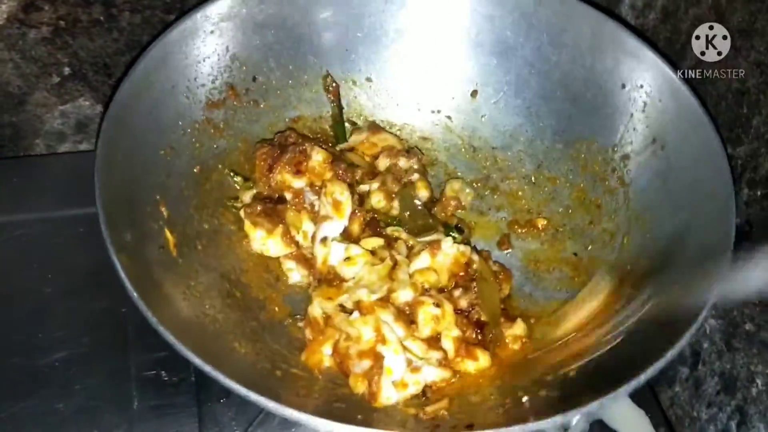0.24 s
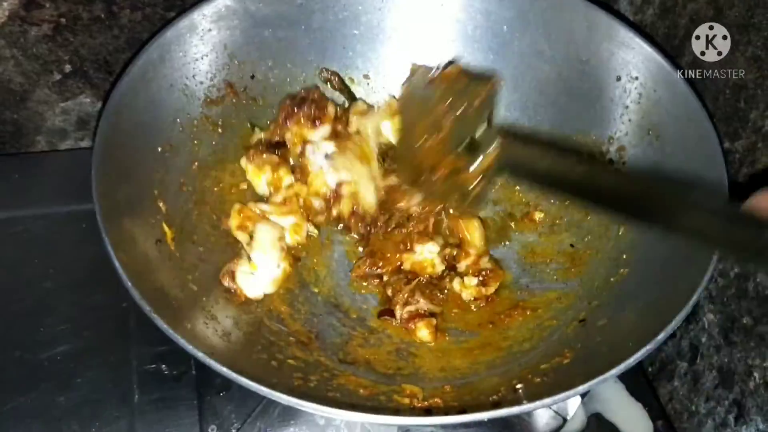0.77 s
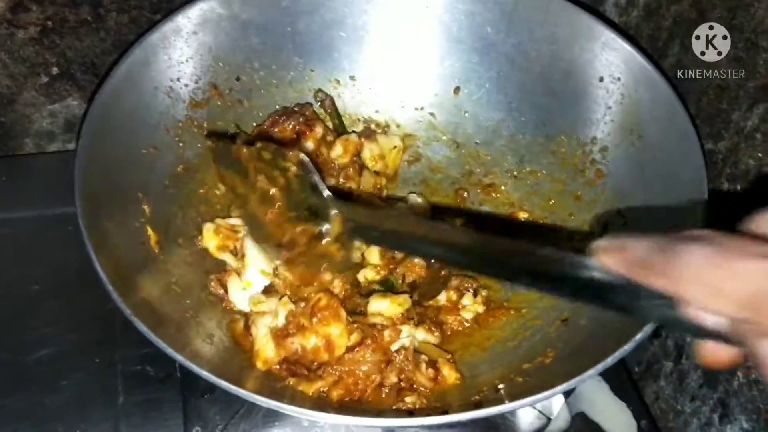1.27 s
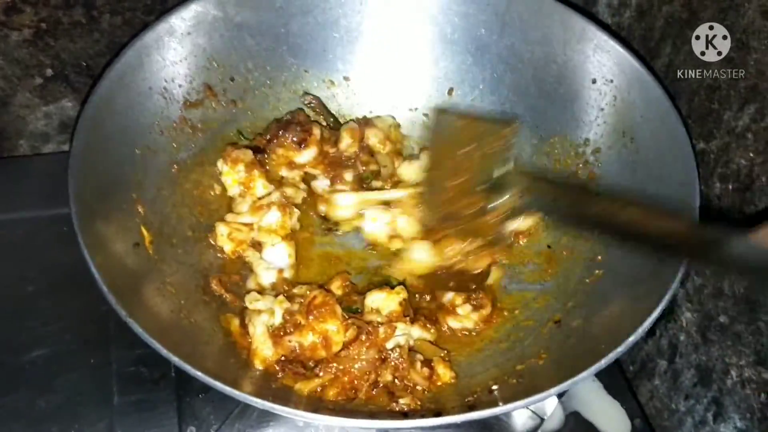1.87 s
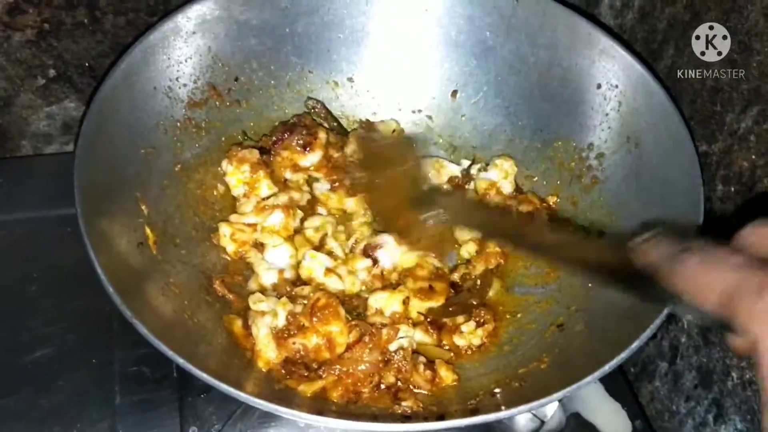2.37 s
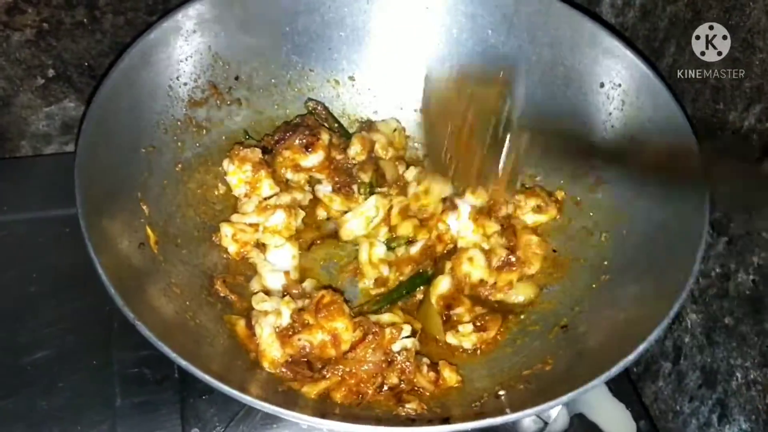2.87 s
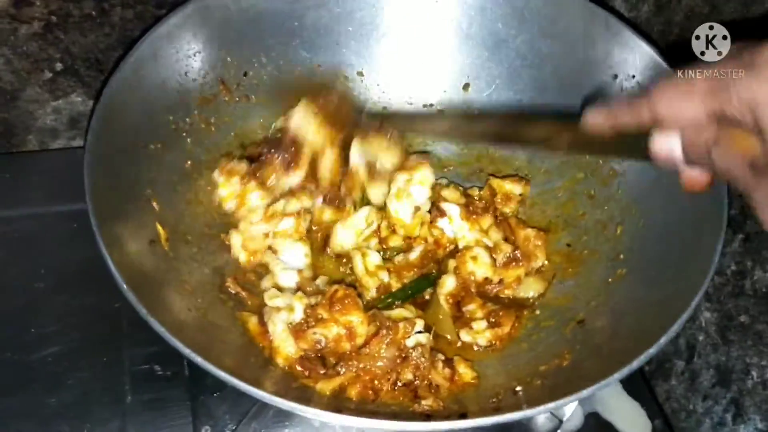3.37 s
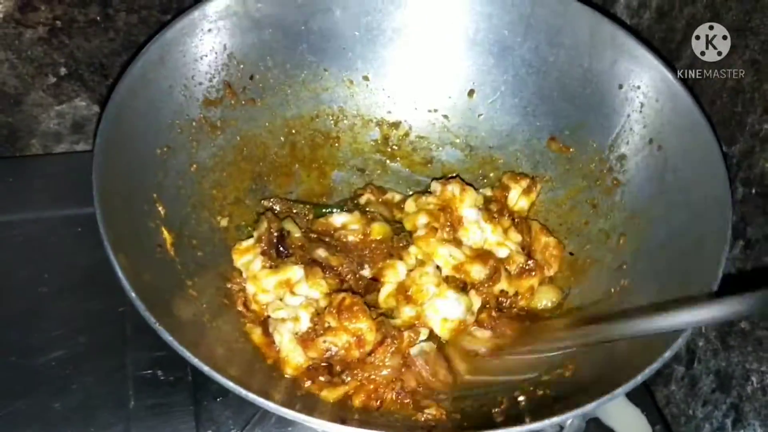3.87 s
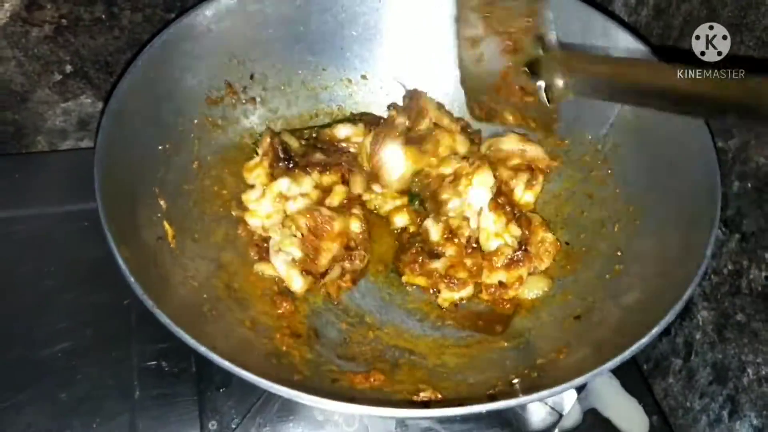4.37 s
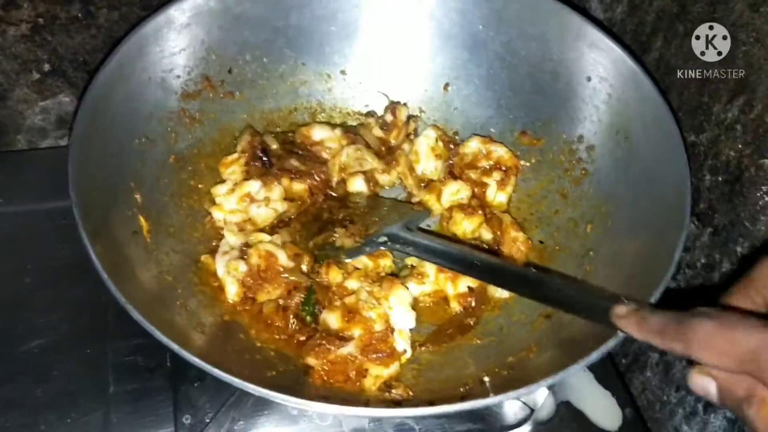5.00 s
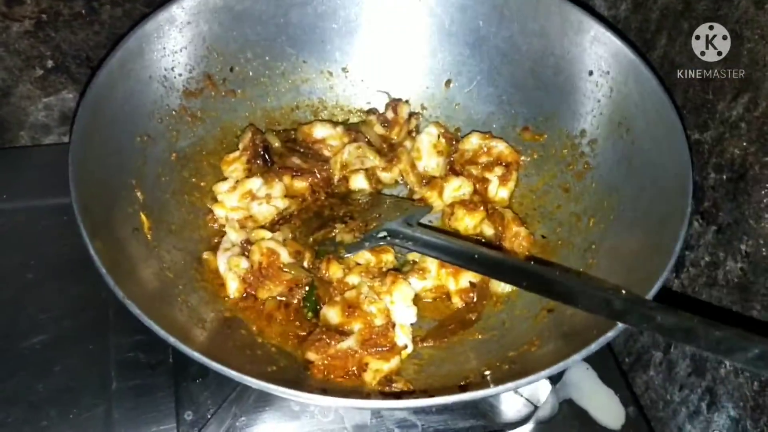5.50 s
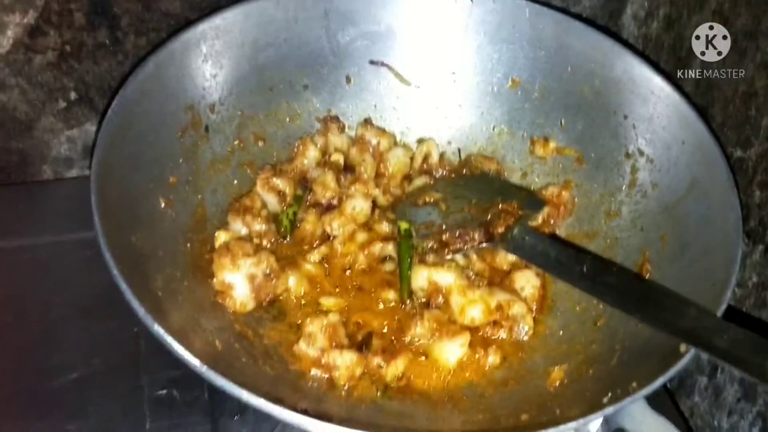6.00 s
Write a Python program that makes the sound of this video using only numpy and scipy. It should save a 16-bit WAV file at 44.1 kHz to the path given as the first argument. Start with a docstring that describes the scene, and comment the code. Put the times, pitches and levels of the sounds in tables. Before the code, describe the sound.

Chunks of fat sizzle and crackle in a metal wok in a small kitchen, heard close up. A steel spatula clatters against the pan, then stirs with irregular knocks, gritty scrapes and a few tiny squeaks. The frying swells as the food is turned. Near the end the sound fades out and returns as a quiet, dull simmer over a low hum.

```python
"""A steel spatula clatters into a metal wok of sizzling chunks of fat in a small kitchen.
Steam bubbles burst by the thousand and flare as turned food meets hot metal. The blade knocks, drags
and judders on the modes of the pan and squeaks on its own; the hardest knocks duck the gain.
Near the end the sound fades out and returns as a quiet, dull simmer over a low hum."""
import sys
import numpy as np
from scipy import signal
from scipy.fft import rfft, irfft, next_fast_len
from scipy.io import wavfile
from scipy.ndimage import uniform_filter1d, minimum_filter1d

SR = 44100
rng = np.random.default_rng(int(sys.argv[2]) if len(sys.argv) > 2 else 0)


def int16_out(signal):
    """Quantize to a 16-bit WAV file."""
    q = np.round(np.clip(np.atleast_2d(signal).T, -1, 1) * 32767)
    wavfile.write(sys.argv[1], SR, q.astype(np.int16))


N = 275625
TIME = np.arange(N) / SR
SIMMER_START_S = 5.75
PUSH_ATTACK_S, CRACKLE_DECAY_S = 0.0034, 0.5
FOOD_DAMPING = 1

# dense ring of pan and kitchen: (frequency [Hz], level [dB])
CLANG = [(25, -32), (70, -0.5), (170, -8), (300, 2), (900, 8.5), (1600, 1.5), (2900, 7), (4100, -9),
         (5400, -0.5), (8000, -16.5), (11000, -19.5), (15000, -20)]
# blade lands in the food and pushes: (time [s], length [s], landing [dB], pressure [dB], grit [dB])
STROKES = [(0.077, 0.23, 3, -21, -27), (0.388, 0.061, -3, -27.5, -32), (0.536, 0.074, -0.5, -29, -34),
           (0.672, 0.17, -8, -35, -56), (1.447, 0.079, -15, -38, -47), (1.837, 0.034, -13, -39, -36),
           (2.074, 0.028, -12, -35, -50.5), (2.991, 0.043, -11.5, -42, -39),
           (3.178, 0.022, -35, -28.5, -45), (3.267, 0.11, -3, -27, -31), (3.56, 0.074, -47, -62, -30),
           (3.679, 0.031, -7.5, -30.5, -52), (3.838, 0.25, -16, -31, -30.5), (4.143, 0.21, -2, -34.5, -52),
           (4.342, 0.097, -6, -28.5, -30.5), (4.875, 0.036, -18, -39, -55),
           (5.124, 0.069, 0.5, -30.5, -27.5), (5.282, 0.011, -9.5, -36.5, -41),
           (5.424, 0.036, -8.5, -34, -30)]


def sizzle(split_hz=4000, crackle_db=6.5, fizz_db=5.5):
    """Big bubbles crackle, small ones fizz; both swell as wet food meets hot metal."""
    # frying bubbles: (frequency [Hz], level [dB])
    spectrum = [(100, -62), (600, -20), (1000, -12.5), (1600, -6.5), (2100, -5), (2850, 0.5), (3400, -4),
                (4050, -11), (5250, 0), (6500, -8), (8100, -15), (11000, -19), (13000, -15.5),
                (14400, -10.5), (15500, -16.5)]
    crackle = off_blade(band(bubbles(spectrum, rate_hz=2400, spread_db=1.5), split_hz, "low", order=6))
    fizz = band(bubbles(spectrum, rate_hz=3000, spread_db=0.2), split_hz, "high", order=6)
    return (unit(crackle) * undb(crackle_db) * boiling(CRACKLE_DECAY_S, column=1)
            + unit(fizz) * undb(fizz_db) * boiling(decay_s=0.38, column=2, steady_db=-1))


def bubbles(spectrum, rate_hz, spread_db, spots=5):
    """Steam bubbles burst at several spots in the oil."""
    pops = sum(ring(clicks(N, rate_hz / spots, spread_db), bowl()) for _ in range(spots))
    return unit(colour(pops, spectrum))


def boiling(decay_s, column, steady_db=0, rise_s=0.037):
    """Bubbling strength: steady frying plus flares that fade as the wet surface dries."""
    # steady frying: (time [s], level [dB])
    frying = [(0, -45.5), (.9, -31), (1.7, -30), (2.4, -37), (3.1, -37), (3.8, -34), (4.2, -32.5),
              (5.6, -32.5)]
    # turned food meets hot metal: (time [s], crackle [dB], fizz [dB])
    flares = [(-.04, -19, -24), (.21, -34.5, -34), (.41, -31.5, -27), (.79, -31, -51), (1.17, -30, -36),
              (1.38, -27, -43), (1.59, -30, -48.5), (1.878, -27.5, -33.5), (2.161, -28, -29),
              (2.83, -32.5, -33), (3.2, -30, -31.5), (3.31, -28, -33.5), (3.55, -38, -36.5),
              (3.93, -28.5, -29), (4.06, -28, -37), (4.399, -30.5, -57), (4.53, -27.5, -32.5),
              (4.979, -27.5, -36), (5.25, -30, -58), (5.429, -32.5, -55)]
    power = sum((undb(row[column]) * envelope(row[0], rise_s, rise_s, decay_s)) ** 2 for row in flares)
    return np.sqrt(undb(curve(frying) + steady_db) ** 2 + power)


def bowl(pop_s=0.00035, echo_db=-19, echo_s=0.041):
    """One burst bubble: a short pop, then reflections from bowl and walls."""
    t = TIME[:4096]
    response = air(len(t)) * (np.exp(-t / pop_s) + undb(echo_db) * np.exp(-t / echo_s))
    return response / np.sqrt(np.sum(response ** 2) / 2)


def off_blade(x, lag_s=0.000685, travel=0.38, sway_hz=2.78, share=0.24):
    """Reflection off the moving blade sweeps notches through the sound."""
    delayed_s = TIME - lag_s * np.exp(travel * wander(sway_hz))
    return x + share * np.array([np.interp(delayed_s, TIME, port) for port in x])


def knocks(level_db=-22, glance_s=0.048, thin_hz=230, edge_hz=9000, bite_hz=2200):
    """Each blow is a tick plus chatter; soft contact misses the high modes, the bare edge drives them."""
    # bare blade on pan: (time [s], strength [dB], brightness [Hz], chatter [s], damping [0-1])
    hits = [(0.068, 4.5, 6000, 0.0012, 0.9), (0.077, 1.5, 3800, 0.011, 0.94),
            (0.098, 9, 7000, 0.00074, 0.8), (0.112, 4.5, 1500, 0.0065, 0.8), (0.124, 4, 1200, 0.002, 0.6),
            (0.241, 3.5, 1000, 0.016, 0.62), (2.224, 8.5, 4500, 0.0025, 0.5),
            (2.231, 6.5, 3400, 0.0087, 0.13), (2.247, 5.5, 3000, 0.011, 0.1),
            (2.269, -2, 2400, 0.0023, 0.23), (2.472, 10, 8600, 0.002, 0.29),
            (2.4757, 6.5, 10000, 0.005, 0.32), (2.521, -2.5, 1600, 0.0033, 0.2),
            (2.839, -6, 4230, 0.0015, 0.2), (3.175, -14.5, 12000, 0.0011, 0.55),
            (3.387, 0.5, 1000, 0.021, 0.64), (3.439, -3.5, 860, 0.015, 0.7),
            (3.896, -8.5, 12000, 0.015, 0.74), (3.943, -4.5, 700, 0.0026, 0.8),
            (4.156, -4, 810, 0.0049, 0.25), (5.0776, -7, 10000, 0.002, 1)]
    out, t = np.zeros((2, N)), TIME[:SR // 2]
    for start_s, db, bright_hz, chatter_s, damping in hits + landings():
        tick = np.exp(-chatter_s / glance_s)  # glancing blow: less tick, more chatter
        chatter = band(clicks(len(t), rate_hz=2500, spread_db=2.0), thin_hz, "high", order=1)
        chatter *= np.exp(-t / chatter_s)
        force = np.sqrt(1 - tick ** 2) * chatter / (np.linalg.norm(chatter) + 1e-9)
        force[0] += tick
        force += bright_hz / edge_hz * band(force, bite_hz, "high", order=1)
        blow = ring(band(force, bright_hz, "low"), pan(damping, spot_db=0.5, clang_db=11.0))
        add(out, start_s, undb(db + level_db) * blow)
    return out


def landings(typical_hz=780, typical_db=-15, db_per_octave=9, chatter_s=0.014):
    """Each stroke opens with a knock cushioned by food; harder is brighter."""
    return [(start_s, db, typical_hz * 2 ** ((db - typical_db) / db_per_octave), chatter_s, FOOD_DAMPING)
            for start_s, _, db, _, _ in STROKES]


def pan(damping, spot_db, clang_db, crack_db=7, crack_s=0.00077, wall_hz=1040, wall_width_hz=260):
    """Pan response at one spot: modes, first crack, dense clang. Food and blade choke the wall's ring."""
    # modes of the loaded pan, plus the blade's brief first ring near 2.9 kHz: (frequency [Hz], level [dB], t60
    # [s])
    pan_modes = [(81.2, -11.5, 0.52), (155, -13.5, 0.29), (243.4, -7, 0.73), (273.5, -7.5, 0.4),
                 (331, -2.5, 0.24), (370.1, 1, 0.24), (420.7, 0.5, 0.14), (572, -0.5, 0.11),
                 (630.8, 3.5, 0.23), (753, 0, 0.18), (877, 2.5, 0.48), (945, 10.5, 0.2), (1017, 0.5, 0.28),
                 (1092, 8.5, 0.3), (1172, 1.5, 0.31), (1400, -13.5, 0.28), (1744, -1.5, 0.22),
                 (2545, 3, 0.13), (2750, 6, 0.2), (2940, 5, 0.12), (2960, 14.5, 0.0098), (3274, 3.5, 0.066),
                 (3242, 2, 0.11)]
    # clang decay: (frequency [Hz], t60 [s])
    clang_t60 = [(200, 0.36), (1000, 0.34), (3000, 0.21), (6000, 0.21), (14000, 0.23)]
    t = TIME[:SR // 2]
    hz, db, t60_s = np.transpose(pan_modes)[:, :, None]
    choke_db = lambda f: 12 * damping / (1 + ((f - wall_hz) / wall_width_hz) ** 2)
    weight = undb(db - choke_db(hz) + spot_db * rng.standard_normal(hz.shape))
    weight *= rng.choice([-1, 1], hz.shape)
    # short waves reach the two ports out of step
    skew_rad = rng.standard_normal(hz.shape) * np.minimum(hz / 1100, 1)
    fading = 1000 ** (-t / (t60_s * undb(-choke_db(hz) / 2)))
    modes = np.array([np.sum(weight * fading * np.cos(2 * np.pi * hz * t + side * skew_rad), 0)
                      for side in (-1, 1)])
    noise, clang = air(len(t)), 0
    for band_hz, band_t60_s in clang_t60:
        share = [(row[0], row[0] == band_hz) for row in clang_t60]
        clang += shape(noise, lambda f: at(share, f)) * 1000 ** (-t / band_t60_s)
    clang *= 1 + undb(crack_db) * np.exp(-t / crack_s)
    clang = shape(clang, lambda f: undb(at(CLANG, f) - choke_db(f) / 2))
    return band(modes + undb(clang_db) * clang, 37, "high")


def drag(soft_hz=540, grit_db=-27, resting_db=-40.5, release_s=0.073, spots=4):
    """The blade sticks and slips; food cushions it, so mostly the low pan modes answer."""
    rubbing = 0
    for _ in range(spots):
        slips = clicks(N, rate_hz=260, spread_db=0.5)
        force = band(slips, soft_hz, "low") + undb(grit_db) * slips
        rubbing += ring(force, pan(FOOD_DAMPING, spot_db=1.5, clang_db=2))
    pressure = undb(resting_db) + pushing(release_s, column=3)
    return pressure * unit(rubbing)


def pushing(release_s, column):
    """Stroke envelope: the blade leans in, holds, lets go."""
    strokes = [undb(row[column]) * envelope(row[0], PUSH_ATTACK_S, row[1], release_s) for row in STROKES]
    return np.max(strokes, axis=0)


def judders(attack_s=0.004, release_s=0.015, drift_hz=4):
    """Pressed hard, the blade sticks and slips on one pan note: a hollow judder or thin squeal. One high note
    also rings out briefly with a hard knock."""
    # single pan notes, mostly stick-slip judders and squeals, one ringing with a hard knock: (time [s], length
    # [s], pitch [Hz], level [dB])
    notes = [(0.073, 0.032, 253, -22), (0.115, 0.06, 623, -17.5), (.15, 0.055, 246, -10.5),
             (.205, 0.12, 243, -23), (0.335, 0.22, 240, -30.5), (0.702, 0.092, 453, -34),
             (1.445, 0.04, 263, -31), (1.84, 0.041, 280, -34), (2.224, .035, 2900, -14.5),
             (3.287, 0.23, 243.4, -25), (3.716, 0.014, 255, -27.5), (3.915, .26, 3160, -28),
             (4.03, 0.059, 365, -31), (4.16, 0.032, 247.7, -22), (4.344, 0.025, 355, -25),
             (5.132, 0.029, 256, -17)]
    drift_cycles = np.cumsum(wander(rate_hz=20)) * drift_hz / SR
    out = 0
    for start_s, length_s, hz, db in notes:
        tone = np.sin(2 * np.pi * (hz * TIME + drift_cycles))
        out += undb(db) * envelope(start_s, attack_s, length_s, release_s) * tone
    return out * flicker(depth_db=4.5, rate_hz=40)


def scrape(band_hz=(1150, 2100)):
    """Wet spice paste grates and smears under the blade on each stroke."""
    grains = clicks(N, rate_hz=900, spread_db=2.0)
    grit = ring(grains, bowl(pop_s=0.0041, echo_db=-13.5, echo_s=0.029))
    return pushing(release_s=0.12, column=4) * unit(band(grit, band_hz, "band"))


def squeaks(width_hz=38, rasp_db=0.5, level_db=5.5, spot_db=5.5, tail_s=0.011):
    """Fast stick-slip drives the blade's modes, differently at each touch, with a dry rasp."""
    # the edge sticks and sings: (time [s], length [s], pitch [Hz], level [dB])
    touches = [(0.093, 0.02, 5270, -23.5), (0.245, 0.017, 5160, -28.5), (3.174, 0.012, 5550, -21),
               (3.888, 0.023, 5630, -15.5), (5.074, 0.011, 5650, -25.5)]
    # blade modes: (frequency / pitch [ratio], level [dB])
    blade_modes = [(0.386, -12), (0.46, -12), (0.836, -2.5), (.905, -8), (0.962, -1), (1.001, 1),
                   (1.045, -9), (1.302, -3), (2.553, -14.5)]
    out, t = np.zeros((2, N)), TIME[:SR // 3]
    ratios, mode_db = np.transpose(blade_modes)
    for start_s, length_s, pitch_hz, db in touches:
        progress = np.minimum(t / length_s, 1)
        grip = np.sqrt(np.maximum(np.sin(np.pi * progress), 0))
        tail = progress * np.exp(-np.maximum(t - length_s, 0) / tail_s)  # the blade rings on
        weights = undb(mode_db - spot_db * rng.standard_normal(len(ratios)))
        peaks = lambda f: weights @ (1 / (1 + ((f - ratios[:, None] * pitch_hz) / width_hz) ** 2))
        tone = band(shape(air(len(t)), peaks), 1800, "high", order=4)
        catches = ring(clicks(len(t), rate_hz=2300, spread_db=1), bowl())
        rasp = colour(band(catches, 6500, "high"), CLANG)
        squeak = unit(tone) + undb(rasp_db) * unit(rasp)
        add(out, start_s, undb(db + level_db) * (grip + tail) * squeak)
    return out


def spits(pitch_hz=2750, scatter=0.053, single_db=-3, small_db=12, spots=5):
    """Large bursts stand out of the sizzle; small ones come at random while the food is wet."""
    # single spits of fat: (time [s], level [dB])
    singles = [(0.63, 0), (1.5547, 15.5), (1.577, 11), (3.981, 3), (6.158, -15)]
    draw_hz = lambda: pitch_hz * np.exp(scatter * rng.standard_normal())
    small = sum(ring(clicks(N, rate_hz=2.5, spread_db=3), spurt(draw_hz())) for _ in range(spots))
    out = undb(small_db) * small * boiling(CRACKLE_DECAY_S, column=1) * (TIME < SIMMER_START_S)
    for start_s, db in singles:
        add(out, start_s, undb(db + single_db) * spurt(draw_hz()))
    return out


def spurt(hz, ring_s=0.00084, splash_db=-3):
    """A wet bubble swells, rings a few cycles, then splashes in the bowl."""
    t = TIME[:4096]
    tone = t * np.exp(-t / ring_s) * np.sin(2 * np.pi * hz * t)
    splash = band(bowl(pop_s=0.0015, echo_db=-10.5, echo_s=0.035), [1900, 3500], "band", order=3)
    return tone / np.linalg.norm(tone) + undb(splash_db) * splash / np.linalg.norm(splash[0])


def simmer(level_db=-50, hum_hz=101, hum_width_hz=6, hum_db=-54):
    """Gentler, duller bubbling over a wavering hum."""
    # simmering bubbles: (frequency [Hz], level [dB])
    spectrum = [(80, -55), (250, -20), (400, -23), (750, -25.5), (1500, -23), (2400, -19), (3100, -20.5),
                (4000, -28.5), (5300, -23), (6800, -34), (8500, -64), (14500, -53)]
    hum = wander(hum_width_hz, centre_hz=hum_hz)
    return undb(level_db) * bubbles(spectrum, rate_hz=4900, spread_db=-0.5) + undb(hum_db) * hum


def kitchen(level_db=-56):
    """Steady low rumble of stove and room."""
    # rumble: (frequency [Hz], level [dB])
    spectrum = [(20, -33.5), (31, -9.5), (47, 7), (62, -3.5), (80, -1), (130, 0), (190, -29.5), (300, -13),
                (700, -23), (1500, -49)]
    return undb(level_db) * unit(colour(air(N), spectrum))


def air(size, alike_hz=800):
    """Diffuse noise at two close microphone ports: alike in the bass, unrelated in the treble."""
    mid, side = rng.standard_normal((2, size))
    apart = lambda f: .5 * f ** 2 / (f ** 2 + alike_hz ** 2)
    mid = shape(mid, lambda f: np.sqrt(1 - apart(f)))
    side = shape(side, lambda f: np.sqrt(apart(f)))
    return np.array([mid + side, mid - side])


def clicks(size, rate_hz, spread_db):
    """Impulses of random time, sign and strength."""
    timing, sign, strength = rng.random((3, size))
    amplitude = undb(-spread_db * np.log(np.maximum(strength, .004)))
    return (timing < rate_hz / SR) * np.sign(sign - .5) * amplitude


def wander(rate_hz, centre_hz=0):
    """Narrow-band noise, unit RMS."""
    return unit(shape(rng.standard_normal(N), lambda f: np.exp(-((f - centre_hz) / rate_hz) ** 2)))


def flicker(depth_db, rate_hz):
    return undb(depth_db * wander(rate_hz))


def envelope(start_s, attack_s, hold_s, release_s):
    rise = np.clip((TIME - start_s) / attack_s, 0, 1)
    return rise * np.exp(-np.maximum(TIME - start_s - hold_s, 0) / release_s)


def undb(db):
    return 10 ** (np.asarray(db) / 20)


def unit(x):
    return x / np.sqrt(np.mean(x ** 2))


def curve(table):
    return np.interp(TIME, *np.transpose(table))


def at(table, hz):
    """Read (frequency [Hz], value) rows on a log-frequency axis."""
    f, value = np.transpose(table)
    return np.interp(np.log(hz + 1), np.log(f), value)


def shape(x, gain):
    """Filter by gain(frequency [Hz])."""
    size = next_fast_len(x.shape[-1] + 2048)
    return irfft(rfft(x, size) * gain(np.fft.rfftfreq(size, 1 / SR)), size)[..., :x.shape[-1]]


def colour(x, spectrum):
    return shape(x, lambda f: undb(at(spectrum, f)))


def band(x, hz, kind, order=2):
    return signal.sosfilt(signal.butter(order, np.minimum(hz, .45 * SR), kind, fs=SR, output="sos"), x)


def ring(force, response):
    return signal.oaconvolve(np.atleast_2d(force), response, axes=1)[:, :len(force)]


def add(out, start_s, x):
    start = int(start_s * SR)
    out[:, start:start + x.shape[1]] += x[:, :N - start]


def lean(left_db):
    """Stereo gains for a left-minus-right level."""
    return undb(np.array([[left_db], [-left_db]]) / 2)


def scene():
    """Frying and stirring give way to the simmer; the blade works slightly left."""
    stirring = lean(2.3) * (drag() + judders()) + scrape()
    blade = lean(5.3) * knocks() + lean(-0.18) * squeaks()
    frying = sizzle() * flicker(depth_db=1.0, rate_hz=24)
    return np.where(TIME < SIMMER_START_S, frying + stirring, simmer()) + blade + spits() + kitchen()


def gain_control(x, ceiling_db=-1.0, hold_s=0.15, release_s=0.057, window=256):
    """A loud knock's first crack gets through and pulls the gain down; it holds, then recovers."""
    power = uniform_filter1d(np.mean(x ** 2, 0), size=window, origin=window // 2 - 1)
    rms = np.sqrt(np.abs(power) + 1e-12)
    excess = np.maximum(np.log(rms / undb(ceiling_db)), 0)
    hold = 2 * int(hold_s * SR / 2) + 1
    held = -minimum_filter1d(-excess, hold, origin=hold // 2)
    recovery = np.exp(TIME / release_s)
    reduction = np.maximum.accumulate(held * recovery) / recovery
    return x * np.exp(-uniform_filter1d(reduction, size=64))


def record(dry):
    """Port colour, gain control, fade, steep top cut."""
    # two microphone ports: (frequency [Hz], left minus right [dB])
    balance = [(60, -1), (200, -2), (380, 2), (700, -3), (1290, -6), (2400, -10.5), (3300, -7.5),
               (4200, 0.5), (5300, 10), (8000, 3.5), (12000, 5), (15000, 14)]
    # fade out and in: (time [s], gain [ratio])
    fade = [(5.6, 0.2), (5.66, 0.07), (5.675, 0), (5.81, 0.0013), (5.9, 0.7)]
    ports = shape(dry, lambda f: np.sqrt(2 / (1 + undb(np.array([[-2], [2]]) * at(balance, f)))))
    top_cut = signal.ellip(10, .2, 70, 15750, fs=SR, output="sos")
    return signal.sosfilt(top_cut, gain_control(ports) * curve(fade))


dry = scene()
out = record(dry)
int16_out(out)
```